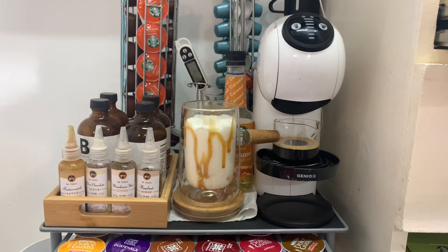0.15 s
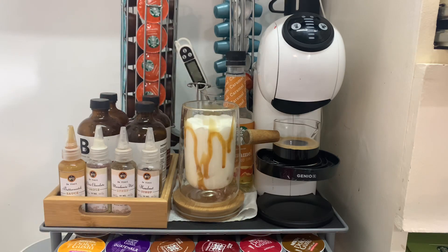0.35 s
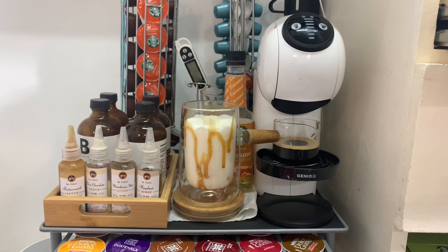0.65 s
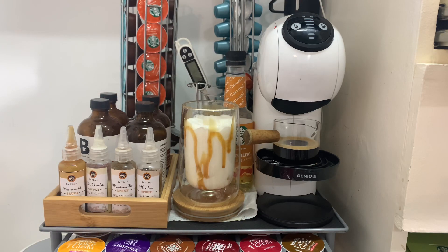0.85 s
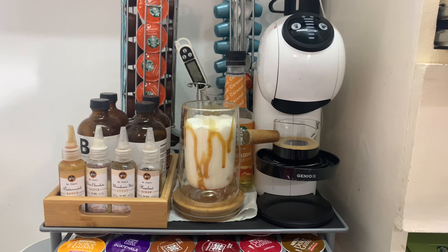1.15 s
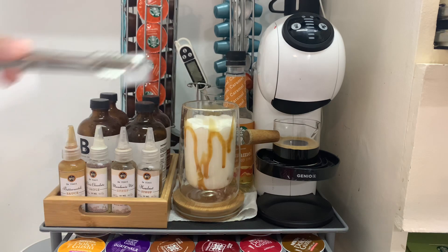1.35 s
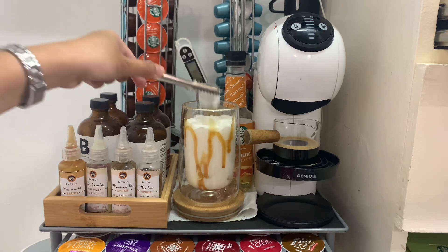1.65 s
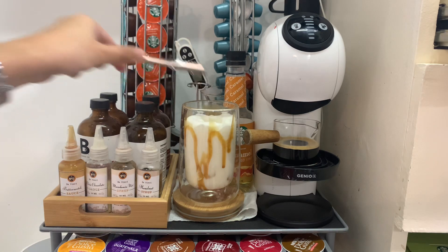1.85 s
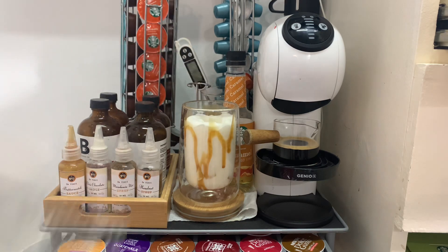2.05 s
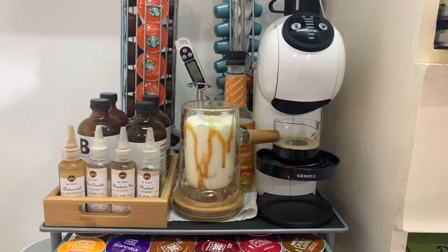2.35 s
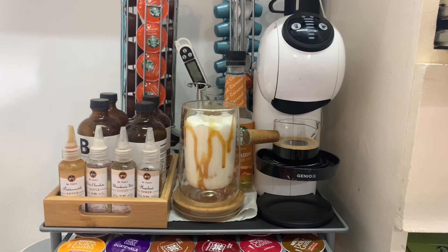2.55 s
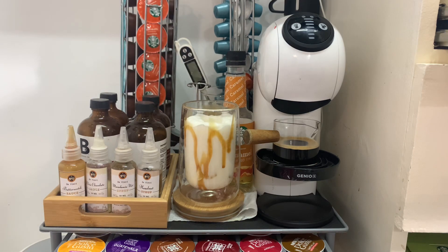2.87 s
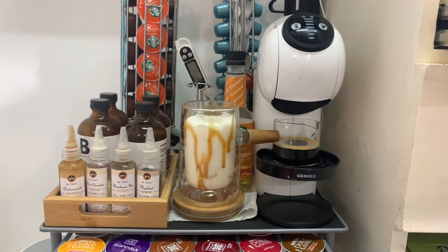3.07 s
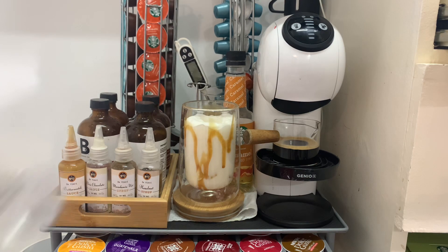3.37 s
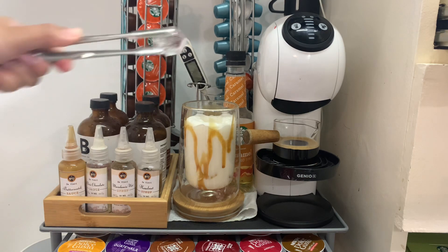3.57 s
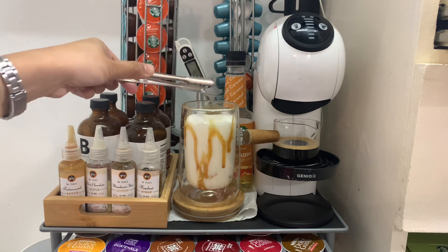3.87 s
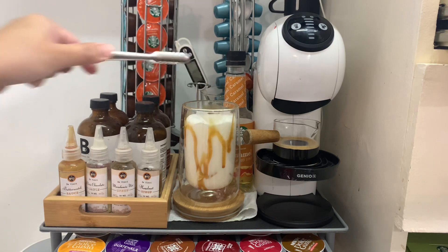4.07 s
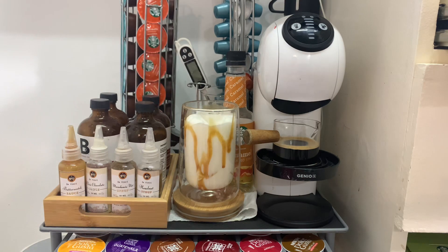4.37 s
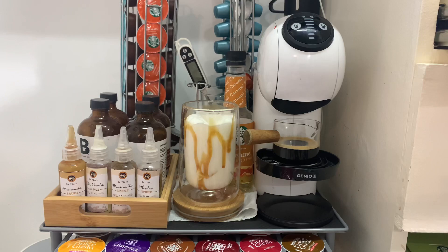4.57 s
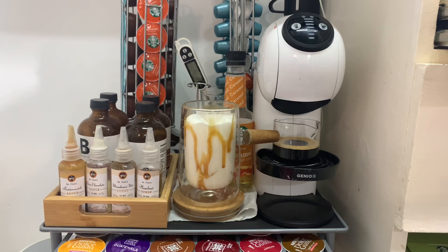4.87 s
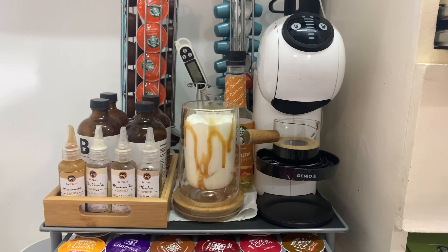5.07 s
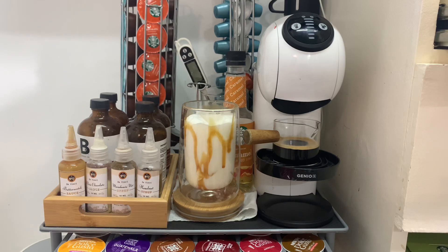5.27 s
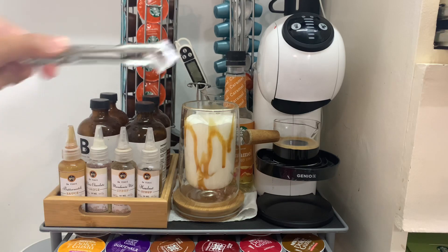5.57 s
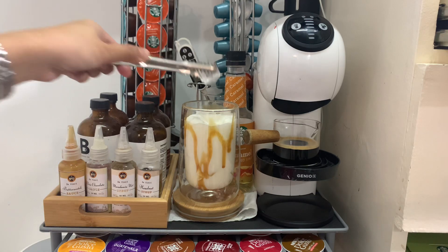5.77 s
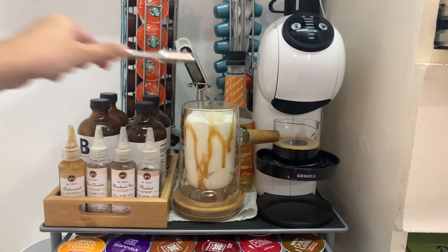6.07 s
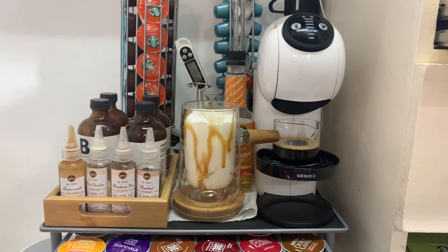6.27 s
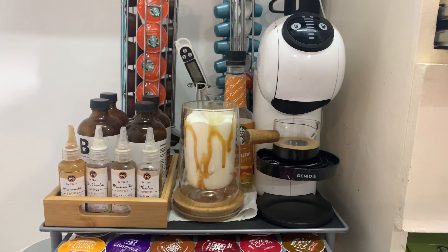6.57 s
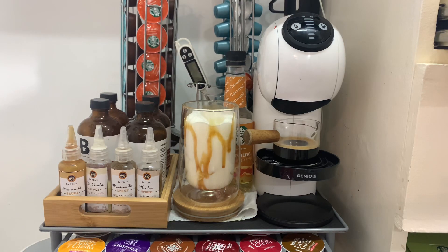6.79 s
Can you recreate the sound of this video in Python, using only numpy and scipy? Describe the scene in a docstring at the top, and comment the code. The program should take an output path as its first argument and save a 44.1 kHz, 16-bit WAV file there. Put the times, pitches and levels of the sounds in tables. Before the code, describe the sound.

A low wavering fridge hum and soft fan air run throughout. Ice rattles and cracks in a plastic tub on the left as steel tongs click and scrape, then a cube ticks dully into a milk-filled glass slightly left of centre. This cycle happens three times, the third dig being longest, before tongs begin lightly stirring the ice again. Near stereo pickup in a small, lightly reverberant kitchen.

```python
"""Ice cubes slide, jostle and knock in a plastic tub to the left as steel tongs rummage there four times.
Each blow is a smooth push plus a brittle crunch, ringing through the tub; tiny random slips make the sliding.
Three cubes go into a glass of milk slightly left of centre, ticking softly against its damped modes.
The tongs click and rasp as noise through steel modes, and a small kitchen answers with a decaying tail.
Behind it all a fridge compressor and a fan hum: wavering tones over a low rumble and moving air."""
import sys
import numpy as np
from scipy import signal
from scipy.fft import rfft, irfft, next_fast_len
from scipy.io import wavfile
from scipy.ndimage import uniform_filter1d, map_coordinates

SR = 44100
rng = np.random.default_rng(int(sys.argv[2]) if len(sys.argv) > 2 else 0)


def unload_wav(signal):
    """Save mono or channel-first audio to the path in sys.argv[1] as 16-bit WAV at rate SR, clipped to [-1, 1]."""
    wavfile.write(
        sys.argv[1],
        SR,
        np.round(np.clip(np.atleast_2d(signal).T, -1, 1) * 32767).astype(np.int16),
    )


N = 305613
SIZE = 16384  # samples in one short sound or response
T, HZ = np.arange(SIZE) / SR, np.fft.rfftfreq(SIZE, 1 / SR)

# the tub's sound reaches the left microphone earlier [ms] and louder [dB, below the treble]
TUB_LAG_MS, TUB_PAN_DB = 0.28, 3.5


def amp(db):
    """Decibels to gain."""
    return 10 ** (np.asarray(db) / 20)


def unit(x):
    """Scale to rms 1."""
    return x / np.sqrt(np.mean(x ** 2) + 1e-20)


def fade(t, t60):
    """Exponential decay, 60 dB down at t60 seconds."""
    return np.exp(-np.log(1000) * t / t60)


def along(points, hz):
    """Read a curve of (frequency [Hz], value) points on a log frequency axis."""
    f, v = np.transpose(points)
    return np.interp(np.log(hz + 1), np.log(f + 1), v)


def wobble(rate):
    """A smooth random curve through this many knots a second."""
    knots = rng.standard_normal(int(N * rate / SR) + 4)
    return map_coordinates(knots, [np.arange(N) * rate / SR])


def filtered(x, response):
    """Shape the spectrum of x by a response of frequency."""
    m = next_fast_len(N + SIZE)
    return irfft(rfft(x, m) * response(np.fft.rfftfreq(m, 1 / SR)), m)[..., :N]


def causal(db):
    """Minimum-phase response with these levels, so that attacks stay sharp."""
    cepstrum = irfft(np.log(amp(db)))
    return np.exp(rfft(np.r_[cepstrum[0], 2 * cepstrum[1:SIZE // 2]], SIZE))


def add(track, s, sound):
    """Mix a stereo sound into the track at s seconds."""
    part = track[:, max(round(s * SR), 0):][:, :sound.shape[1]]
    part += sound[:, :part.shape[1]]


def rush(spectrum, pan_db):
    """Steady noise whose likeness at the two microphones varies with frequency."""
    # likeness of the two microphones: (frequency [Hz], correlation [-1 to 1])
    likeness = [(60, 0.69), (130, 0.96), (290, 0.83), (450, 0.37), (640, -0.052), (1410, -0.28),
                (3100, 0.012)]

    def mid_side(hz):
        turn = np.arccos(np.clip(along(likeness, hz), -1, 1)) / 2
        return amp(along(spectrum, hz)) * [np.cos(turn), np.sin(turn)]

    mid, side = filtered(rng.standard_normal((2, N)), mid_side)
    return unit(np.array([mid + side, mid - side])) * amp([[pan_db / 2], [-pan_db / 2]])


def machines():
    """Compressor and fan: motor tones, some wavering, over a low rumble and moving air."""
    # motor tones: (frequency [Hz], level [dB], left over right [dB], unsteadiness [0-1])
    hum = [(58.6, -37, 2, 0.05), (118.2, -55.5, -4, 0), (120.5, -58, -3, 0), (142, -66.5, 4, 0.6),
           (171.8, -60, -12.5, 0.43), (179.1, -53, 0.5, 0.83), (247, -76, -10, 0), (257.7, -59, 20.5, 0),
           (279.4, -41.5, -4, 0.13), (363, -65.5, -18, 0.9)]
    # shape of the low rumble: (frequency [Hz], relative density [dB per Hz])
    rumble = [(20, -20), (42, -18), (58, 6.5), (78, 2.5), (95, 8), (115, 5.5), (135, -11.5), (180, -2.5),
              (205, -6.5), (230, 6.5), (258, 4.5), (280, 13), (305, -5), (420, -3.5), (700, -42),
              (3000, -90)]
    # shape of the moving air: (frequency [Hz], relative density [dB per Hz])
    air = [(190, -12.5), (330, 0.5), (447, -16), (516, -6), (600, -6), (710, -3.5), (860, -10.5),
           (1280, -10.5), (1800, -17.5), (2900, -19), (5060, -29), (10700, -33.5), (12000, -61.5),
           (13600, -35.5), (15000, -80)]
    t, out = np.arange(N) / SR, np.zeros((2, N))
    for hz, db, pan_db, unsteady in hum:
        waver = 1 + unsteady * (wobble(9.9) + 1j * wobble(7.5))
        carrier = np.exp(2j * np.pi * (hz * t + rng.random()))
        tone = unit(np.real(waver * carrier))
        out += amp([[db + pan_db / 2], [db - pan_db / 2]]) * tone
    return out + amp(-43.5) * rush(rumble, pan_db=-6.0) + amp(-45) * rush(air, pan_db=0.0)


def path(lag_ms, pan_db, room_db):
    """Responses to both microphones: direct sound, left first, and the kitchen's diffuse tail."""
    # decay of the kitchen: (frequency [Hz], t60 [s])
    kitchen = [(200, 0.18), (900, 0.094), (3000, 0.19), (8000, 0.14), (15000, 0.052)]
    hz, t, z = signal.stft(rng.standard_normal((2, SIZE)), SR, nperseg=256)
    decaying = z * fade(t, along(kitchen, hz)[:, None])
    tail = signal.istft(decaying, SR, nperseg=256)[1][:, :SIZE]
    tail = unit(tail * (1 - np.exp(-(T / 0.00057) ** 2))) / np.sqrt(SIZE)  # energy 1
    lean_db = pan_db * along([(2500, 1), (6000, 0)], HZ)  # the treble reaches both equally
    right_lag = np.exp(-2j * np.pi * HZ * lag_ms / 1000)
    direct = np.array([amp(lean_db / 2), amp(-lean_db / 2) * right_lag])
    return direct, amp(room_db) * rfft(tail)


def ringing(modes, ring_db, vary_db):
    """Response of a body: the blow itself plus its modes, at new strengths each time."""
    hz, db, t60 = np.transpose(modes)[:, :, None]
    detune, strength = rng.standard_normal((2, len(modes), 1))
    ring = np.cos(2 * np.pi * hz * (1 + 0.0018 * detune) * T) * fade(T, t60)
    ring /= np.linalg.norm(ring, axis=1, keepdims=True)
    return 1 + rfft(np.sum(amp(db + ring_db + vary_db * strength) * ring, 0))


def spiky(spread_db):
    """Noise made of micro-fractures of very unequal size."""
    return rng.standard_normal(SIZE) * amp(spread_db * rng.standard_normal(SIZE))


def steel(stroke, sparkle_db, room_db):
    """Thin, bright sound of the tongs under a spiky force of this shape, at energy 1 before the path."""
    # ring of the tongs: (frequency [Hz], relative level [dB], t60 [s])
    steel_modes = [(5320, -5, .06), (6875, -5, .09), (7400, -4, .08), (8090, -7, .1), (9100, -3, .06),
                   (9705, -3, .08), (11140, -3, .06), (12650, -2, .06), (13200, -1, .06), (13850, -3, .06)]
    # colour of steel on ice: (frequency [Hz], relative level [dB])
    thin = [(1000, -6), (4000, 3), (7000, 0), (10000, 11), (13000, 3.5), (14500, 1), (16000, -19)]
    force = spiky(spread_db=4) * stroke
    top_db = along([(10000, 0), (13000, sparkle_db)], HZ)
    body = ringing(steel_modes, ring_db=-17, vary_db=1.5)
    sound = rfft(force) * body * causal(along(thin, HZ) + top_db)
    sound = sound / np.sqrt(np.mean(abs(sound) ** 2))
    return irfft(sound * sum(path(lag_ms=0.1295, pan_db=7, room_db=room_db)))


def tongs():
    """The toothed jaws click, and skid over frost with a short hiss."""
    # clicks of the jaws: (time [s], relative level [dB], sparkle of the top treble [dB])
    clicks = [(0.346, -38, 3), (0.386, -39, 6), (0.419, -29, 8), (1.143, -48.5, -5), (1.796, -46, -2),
              (2.434, -28, -4), (3.821, -35, 5), (3.883, -24, 7), (5.957, -47, 2)]
    # rasps over frost: (time [s], relative level [dB], length [s])
    rasps = [(2.422, -61, .03), (4.51, -57, 0.12), (6.605, -65, 0.057), (6.823, -46.5, 0.099)]
    out = np.zeros((2, N))
    for s, db, sparkle_db in clicks:
        add(out, s, amp(db + 18.5) * steel(fade(T, t60=0.021), sparkle_db, room_db=-7.5))
    for s, db, length in rasps:
        stroke = (1 - np.exp(-T / 0.0018)) * np.exp(-3 * T / length)
        add(out, s, amp(db + 35.0) * steel(stroke, sparkle_db=-2, room_db=-1))
    return out


def crunch(t60, spread_db):
    """Spectrum of a few ms of brittle micro-fractures: finely rippled, but even in its broad colour."""
    burst = rfft(spiky(spread_db) * fade(T, t60) * (1 - np.exp(-T / 0.001)))
    power = uniform_filter1d(abs(burst) ** 2, size=301)
    return burst * causal(-10 * np.log10(abs(power) + 1e-12))


def contact(colour, knock_db, crack_db, crunch_t60):
    """Spectrum of one blow: a smooth push in the bass, a few ms of brittle crunch above it."""
    push_hz = 600  # where the push gives way to the crunch
    push = 1 / (1 + 1j * np.sqrt(2) * HZ / push_hz - (HZ / push_hz) ** 2)
    force = push + np.sqrt(abs(1 - abs(push) ** 2)) * crunch(crunch_t60, spread_db=4)
    weight_db = along([(550, knock_db), (900, 0), (3000, 0), (6000, crack_db)], HZ)
    return force * causal(along(colour, HZ) + weight_db)


def clink(blow, spot_hz, spot_db, width, direct, room):
    """The struck spot rings briefly; its pitch is clearest in the direct sound."""
    # width: relative half-width of the spot's resonance
    spot = causal(spot_db / (1 + (np.log((HZ + 1) / spot_hz) / width) ** 2))
    middle = (HZ > 700) & (HZ < 4000)  # the blow's strength is set in this band
    size = np.sqrt(np.mean(abs(blow * spot)[middle] ** 2))
    spot_in_room = 0.4  # share of the resonance that colours the kitchen's answer
    return irfft(blow / size * (spot * direct + abs(spot) ** spot_in_room * room))


def glass():
    """Each cube meets the glass slightly left of centre; the milk damps its ring."""
    # cubes landing: (time [s], relative level [dB], hollow knock [dB before the glass's gain],
    # brittle crack [dB before the glass's gain], pitch of the struck spot [Hz], its ring [dB])
    landings = [(1.717, -16.5, -15, -33, 1940, 13), (1.791, -32, -29, -23.5, 3000, -6),
                (3.883, -20.5, -16, -19, 1100, 15.5), (3.892, -25, -8, -22, 1050, 5),
                (4.047, -26, -19, -17, 700, 19), (4.063, -23.5, -19, -24, 710, 21),
                (4.08, -26.5, -21, -20, 730, 16.5), (5.912, -21, -22, -16.5, 3900, 10),
                (5.93, -26, -13.5, -22, 1050, -3)]
    # ring of the milk-filled glass: (frequency [Hz], relative level [dB], t60 [s])
    glass_modes = [(434, -12, .04), (732, -3, .08), (1090, -5, .04), (1752, -7, .04), (2180, -4, .04),
                   (2450, -6, .05), (2740, -6, .06), (3390, -8, .06)]
    # colour of a contact with the glass: (frequency [Hz], relative level [dB])
    glass_colour = [(120, -8), (250, -2), (400, 6), (600, -3), (950, -3), (1900, -6.5), (3800, -5.5),
                    (5200, -4.5), (7800, -4.5), (11000, -12), (13500, -21), (16000, -36)]
    knock_gain_db, crack_gain_db = 16.5, 11.5
    out = np.zeros((2, N))
    for s, db, knock_db, crack_db, spot_hz, spot_db in landings:
        body = ringing(glass_modes, ring_db=-29, vary_db=1.5)
        blow = body * contact(glass_colour, knock_db + knock_gain_db, crack_db + crack_gain_db,
                              crunch_t60=0.014)
        direct, room = path(lag_ms=0.072, pan_db=4.0, room_db=-1)
        add(out, s, amp(db + 20.5) * clink(blow, spot_hz, spot_db, 0.28, direct, room))
    return out


def struck_tone(s, db, hz, t60, lag_ms, pan_db, room_db):
    """One damped mode, set off at s seconds."""
    out = np.zeros((2, N))
    tone = np.cos(2 * np.pi * hz * T) * fade(T, t60) * (1 - np.exp(-T * hz))
    add(out, s, amp(db) * irfft(rfft(tone) * sum(path(lag_ms, pan_db, room_db))))
    return out


def ping():
    """One cube falls free and pings as a single damped mode."""
    # the ping: (time [s], level [dB], frequency [Hz], t60 [s], lead of the left microphone [ms],
    # left over right [dB], kitchen's answer [dB])
    free_cube = (2.5505, -18, 1810, .02, .14, 1, -7)
    return struck_tone(*free_cube)


def thumps():
    """The hollow floor of the tub answers heavy blows with a low damped mode."""
    # thumps of the floor: (time [s], level [dB], frequency [Hz])
    floor_blows = [(0.616, -22, 445), (2.629, -31, 473), (4.521, -45, 517), (5.021, -21, 497)]
    return sum(struck_tone(s, db, hz, 0.052, TUB_LAG_MS, TUB_PAN_DB, room_db=-5)
               for s, db, hz in floor_blows)


def efforts():
    """How hard the tongs stir the cubes, as a gain: it builds up, eases as they give way, dies out."""
    # strokes of the tongs: (start [s], length [s], effort before easing [dB])
    strokes = [(0.308, 0.19, -42), (0.527, 0.35, -50), (2.41, 0.085, -41.5), (2.53, 0.077, -43),
               (4.605, 0.49, -42), (6.67, 0.3, -57.5)]
    attack_s, ease_db_per_s, release_s = 0.067, 15.5, 0.06
    t, out = np.arange(N) / SR, np.zeros(N)
    for s, length, db in strokes:
        attack = np.clip((t - s) / attack_s, 0, 1)
        release = np.clip(1 - (t - s - length) / release_s, 0, 1)
        out += attack * release * amp(db - ease_db_per_s * np.maximum(t - s, 0))
    return out


def sliding(effort, scatter_db=6):
    """Ice grinds over ice in tiny slips between the knocks."""
    # colour of sliding ice: (frequency [Hz], relative level [dB])
    grit_colour = [(250, -11), (600, 0.5), (1000, 4.5), (2200, -4), (3800, -13.5), (5300, -14.5),
                   (8000, -17), (13500, -25), (16000, -52)]
    slips_per_s = 300
    sizes = amp(scatter_db * np.clip(rng.standard_normal(N), -2, 2))
    slips = (rng.random(N) < slips_per_s / SR) * rng.choice([-1, 1], N) * sizes
    grit = unit(signal.fftconvolve(slips, irfft(causal(along(grit_colour, HZ))))[:N])
    space = irfft(sum(path(TUB_LAG_MS, TUB_PAN_DB, room_db=-2)))
    return amp(4.0) * signal.fftconvolve((effort * grit)[None], space, axes=1)[:, :N]


def jostles(effort):
    """Small bumps between neighbouring cubes at uneven moments of stirring, as rows for tub()."""
    per_s = 32  # one chance of a bump in each slot, taken only while the cubes are stirred
    over_effort_db, scatter_db = 9.5, 5
    usual_hz, scatter_octaves = 1420, 0.5
    knock_db, crack_db, ring_db = -22, -21, 11  # knock and crack before the tub's gain
    slots = np.arange(int(N / SR * per_s))
    times = (slots + rng.random(len(slots))) / per_s
    size, pitch = rng.standard_normal((len(slots), 2)).T
    strengths = over_effort_db + scatter_db * size
    spots = usual_hz * 2 ** (scatter_octaves * pitch)
    pushes = effort[(times * SR).astype(int)]
    return [(s, 20 * np.log10(push) + db, knock_db, crack_db, hz, ring_db)
            for s, push, db, hz in zip(times, pushes, strengths, spots) if push > 0]


def lead_ins(blows):
    """The ice starts to give: a weaker crunch 3 ms ahead of each hard blow."""
    hard_db, lead_s, drop_db = -12, 0.003, 6.5
    return [(s - lead_s, db - drop_db, *colour) for s, db, *colour in blows if db > hard_db]


def tub(blows):
    """Cubes snap loose and knock about in the tub, off to the left, each blow exciting its modes."""
    # ring of the plastic tub: (frequency [Hz], relative level [dB], t60 [s])
    tub_modes = [(505, 2, .08), (644, -2, .13), (708, -2, .11), (785, -5, .08), (912, 1, .12),
                 (990, -3, .09), (1092, -3, .11), (1210, -3, .08), (1395, -1, .14), (1565, 1, .11),
                 (1860, 1, .18), (2050, -5, .1), (2410, -2, .09), (2730, -5, .08), (3628, 2, .07),
                 (3915, 2.5, .07), (7860, 1, .015)]
    # colour of a contact in the tub: (frequency [Hz], relative level [dB])
    tub_colour = [(120, -40), (300, 5), (450, 10), (620, 9), (790, 0.5), (980, 2), (1900, -0.5),
                  (3800, -7.5), (5200, -6), (7800, -9.5), (9000, -7.5), (11000, -17), (13500, -15),
                  (16000, -35)]
    knock_gain_db, crack_gain_db = 4, 13
    out = np.zeros((2, N))
    for s, db, knock_db, crack_db, spot_hz, spot_db in blows:
        body = ringing(tub_modes, ring_db=-25, vary_db=1.5)
        blow = body * contact(tub_colour, knock_db + knock_gain_db, crack_db + crack_gain_db,
                              crunch_t60=0.013)
        direct, room = path(TUB_LAG_MS, TUB_PAN_DB, room_db=-1.5)
        add(out, s, amp(db + 25.0) * clink(blow, spot_hz, spot_db, 0.18, direct, room))
    return out


def scene():
    """Everything as the two microphones hear it."""
    # clear knocks of ice in the tub: (time [s], relative level [dB], hollow knock [dB before the tub's
    # gain], brittle crack [dB before the tub's gain], pitch of the struck spot [Hz], its ring [dB])
    knocks = [(0.329, -22.5, -13.5, -21.5, 1050, 4.5), (0.334, -21.5, -29, -20, 2240, 18),
              (0.346, -26.5, -16, -17, 705, 10), (0.363, -28, -20, -25, 950, 14),
              (0.386, -19.5, -15, -22, 1030, 10), (0.41, -13.5, -19, -17.5, 894, 9.5),
              (0.417, -18.5, -15.5, -24, 1420, -2), (0.432, -14.5, -24, -15, 2030, 17.5),
              (0.47, -19.5, -21, -22, 1160, 9), (0.497, -20.5, -16, -23, 1060, 8),
              (0.547, -26, -17, -27, 1100, -2), (0.571, -27.5, -17, -16, 3900, 6),
              (0.581, -18, -28, -23, 1000, 7), (0.591, -16, -18, -12, 1090, 15),
              (0.597, -14, -19, -18.5, 4130, 5.5), (0.614, -7, -11.5, -17, 1560, 16),
              (0.618, -13, -10, -28, 990, 12), (0.662, -23.5, -27, -24, 3800, 6),
              (0.711, -37, -24, -30, 1200, 9), (0.757, -38, -27, -18, 3300, 12),
              (0.783, -26, -20.5, -25, 960, 5), (0.803, -38, -22, -30, 1100, 11),
              (0.819, -29, -25, -24, 1010, 16), (0.845, -20, -20, -22.5, 1850, 19.5),
              (0.898, -29, -11, -24, 1010, 8), (2.433, -15.5, -21.5, -12, 1100, 7.5),
              (2.449, -26, -22, -22, 1200, 6), (2.474, -33, -10, -19, 1300, 5),
              (2.55, -22, -27, -16.5, 1970, 10), (2.578, -30.5, -20, -19, 1600, 6),
              (2.594, -25.5, -19, -22, 1100, 3), (2.611, -31, -26, -12, 1200, 6),
              (2.629, -16.5, -13.5, -20.5, 910, 6.5), (2.709, -34, -27, -18, 3720, 15),
              (2.717, -31.5, -29, -20.5, 3020, 7), (2.779, -22.5, -22, -22.5, 1560, 8),
              (2.791, -31, -23, -17, 1300, 0), (2.803, -18.5, -12, -20.5, 1090, 15),
              (2.97, -27.5, -21, -25, 1130, 4), (2.999, -19.5, -12, -20.5, 810, 14.5),
              (3.0, -33, -30, -23, 3680, 17), (4.518, -27, -17, -18, 1190, -1),
              (4.521, -13, -16.5, -14, 970, 6), (4.546, -22.5, -13, -21, 744, 11),
              (4.624, -19.5, -22, -25, 694, 12), (4.649, -22, -16, -26, 922, 6),
              (4.666, -33, -27, -13, 1300, 2), (4.70, -23, -28, -10.5, 1810, 11),
              (4.718, -17.5, -24, -24, 973, 4), (4.729, -20.5, -23, -25, 2700, -3),
              (4.737, -17, -17, -18, 930, 7), (4.746, -26, -16, -24, 1130, 6),
              (4.768, -23.5, -15, -31, 980, 14), (4.804, -20, -22, -32, 1090, 9),
              (4.813, -23.5, -24, -26, 2100, 9), (4.839, -22.5, -30, -24, 908, 4),
              (4.864, -25, -23, -40, 1200, 20), (4.874, -15, -10.5, -22.5, 950, 17),
              (4.875, -28.5, -21, -31, 3680, 22), (4.928, -27, -21, -33, 991, 18),
              (4.939, -27, -20, -30, 1100, 8), (4.958, -22, -23, -25, 1600, 13),
              (5.021, -8, -12, -17.5, 905, 6.5), (5.022, -14.5, -29, -24, 3750, 8.5),
              (5.096, -23.5, -24, -34, 1055, 15), (6.683, -28, -10, -12.5, 1140, 18.5),
              (6.69, -29.5, -24, -29, 1930, 14), (6.802, -32, -18, -26, 1900, 15),
              (6.822, -43, -20, -26, 1300, 12), (6.858, -31, -22, -24, 1500, 11),
              (6.923, -21, -17, -18.5, 1320, 12.5)]
    effort = efforts()
    ice = tub(knocks) + tub(lead_ins(knocks)) + tub(jostles(effort)) + sliding(effort)
    return ice + thumps() + ping() + glass() + tongs() + machines()


def record(dry):
    """The recorder keeps nothing from its band limit of 16.3 kHz upwards."""
    return filtered(dry, lambda hz: hz < 16300)


dry = scene()
out = record(dry)
unload_wav(out)
```